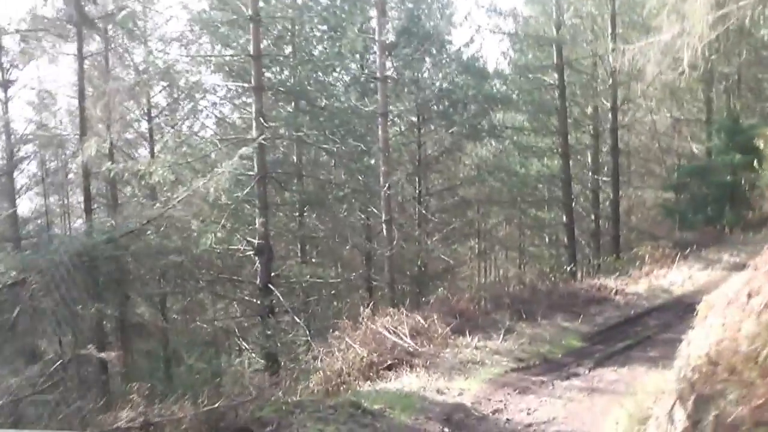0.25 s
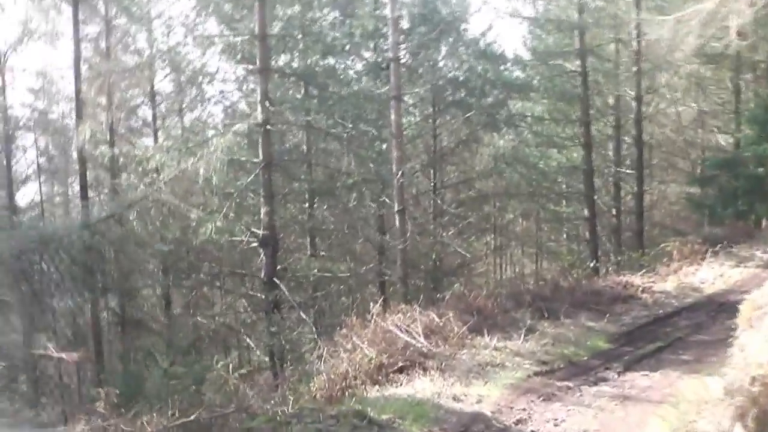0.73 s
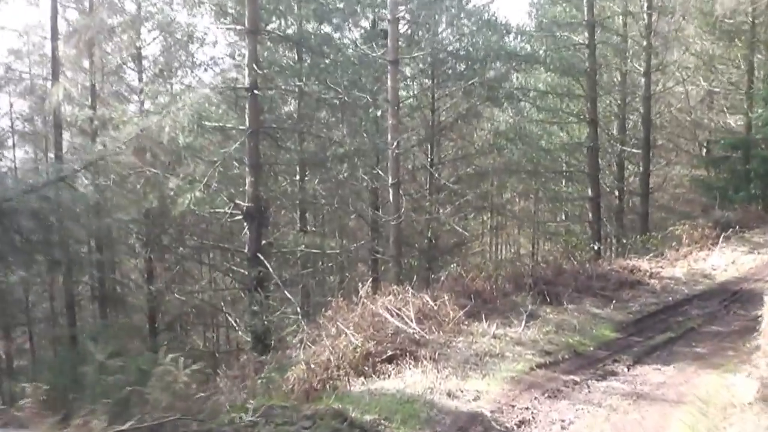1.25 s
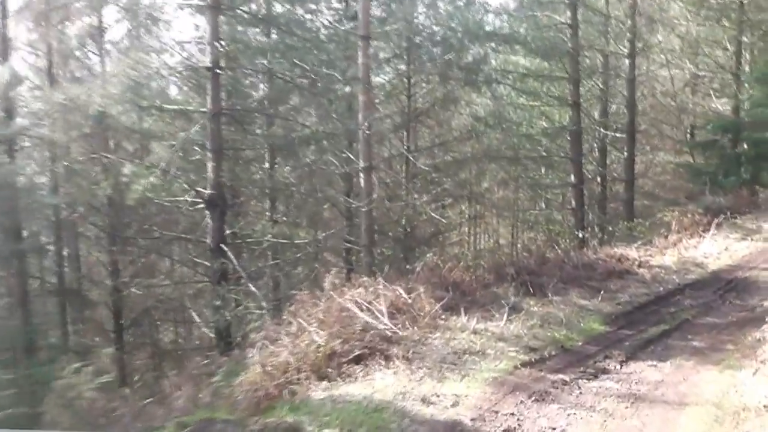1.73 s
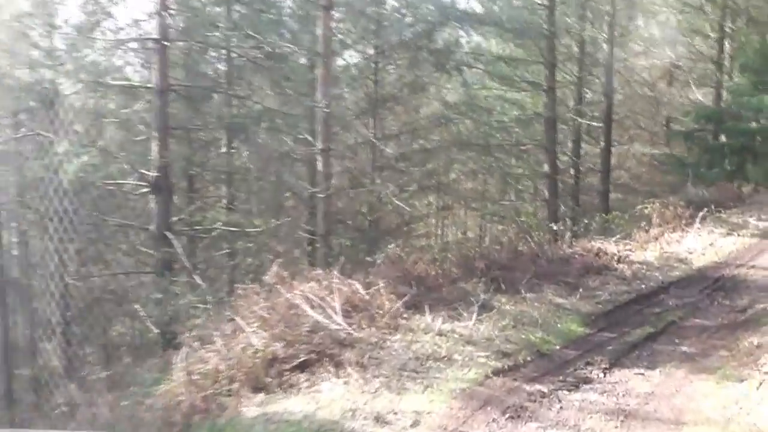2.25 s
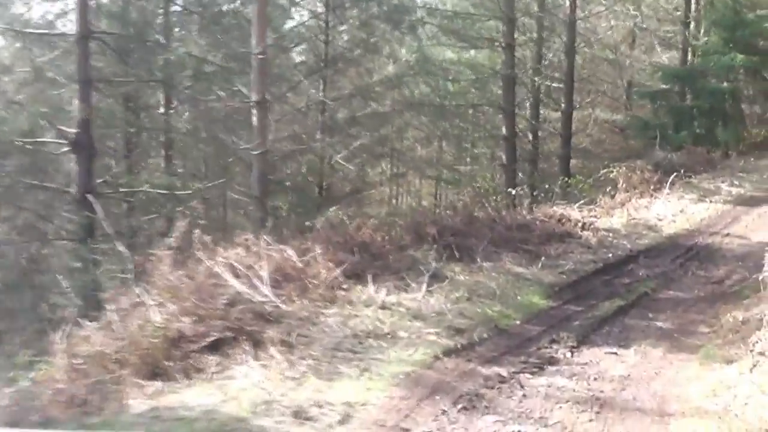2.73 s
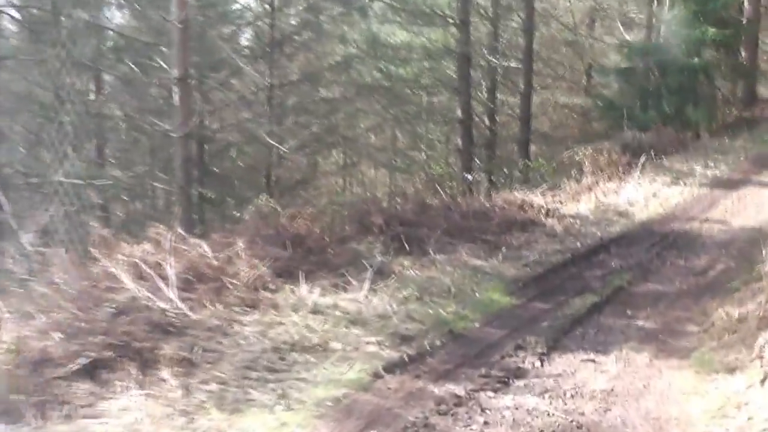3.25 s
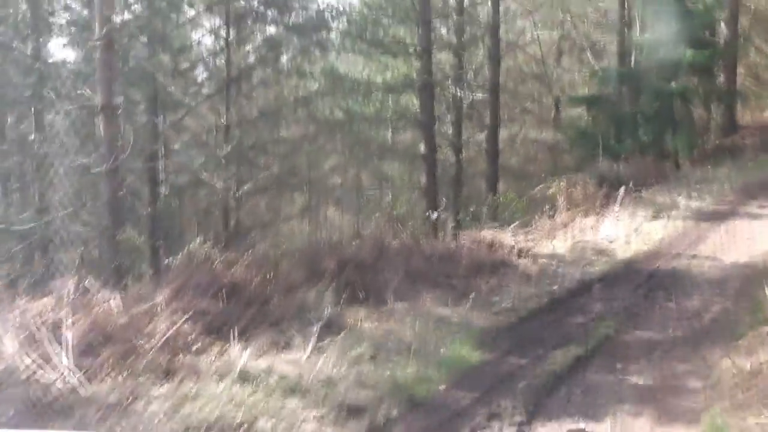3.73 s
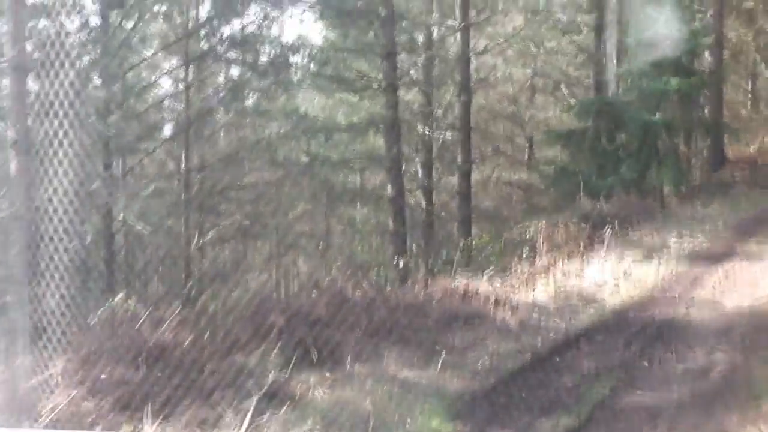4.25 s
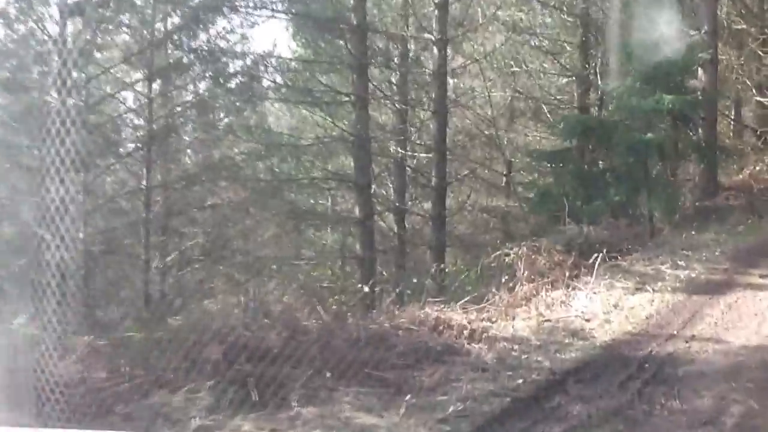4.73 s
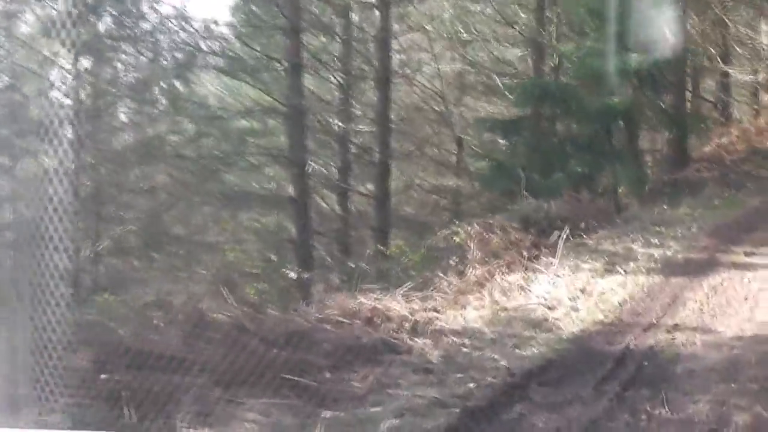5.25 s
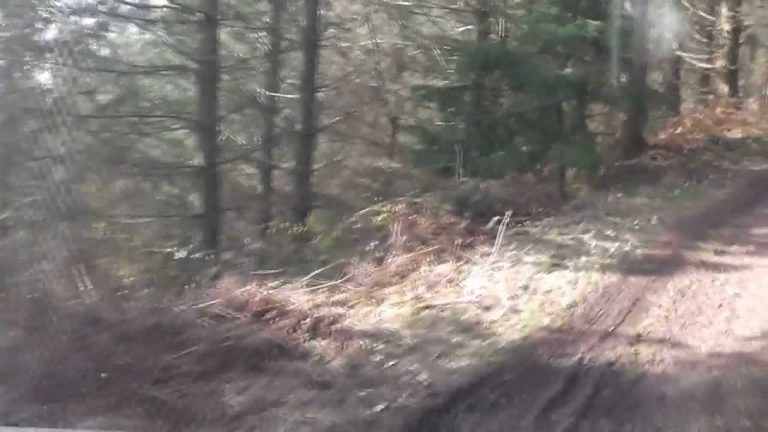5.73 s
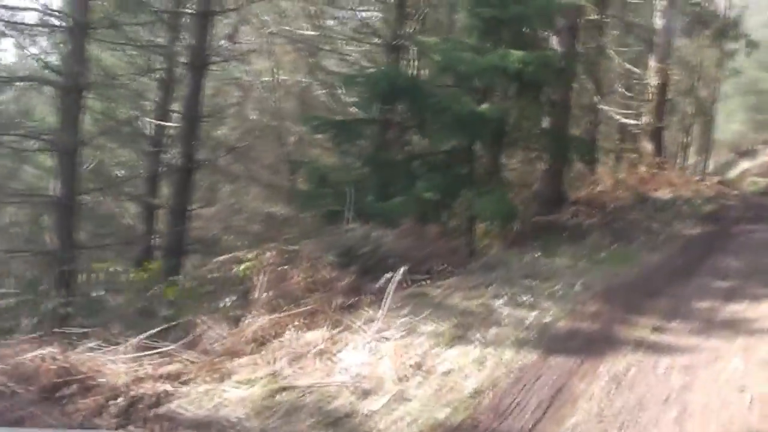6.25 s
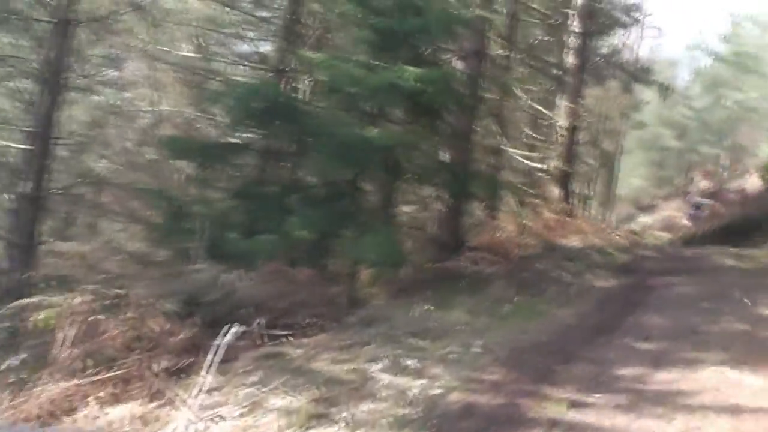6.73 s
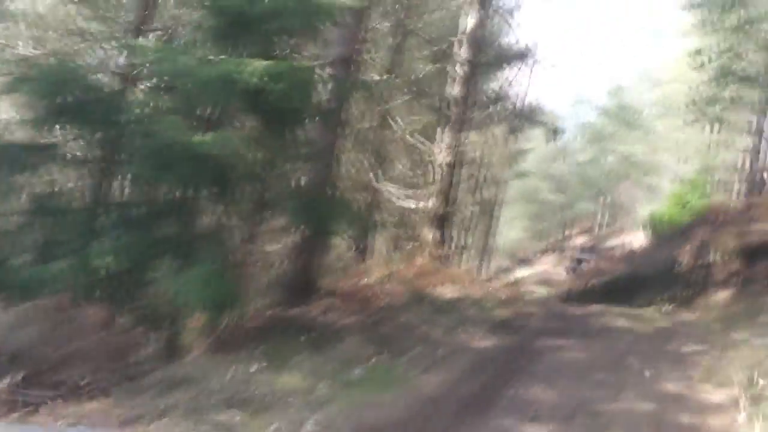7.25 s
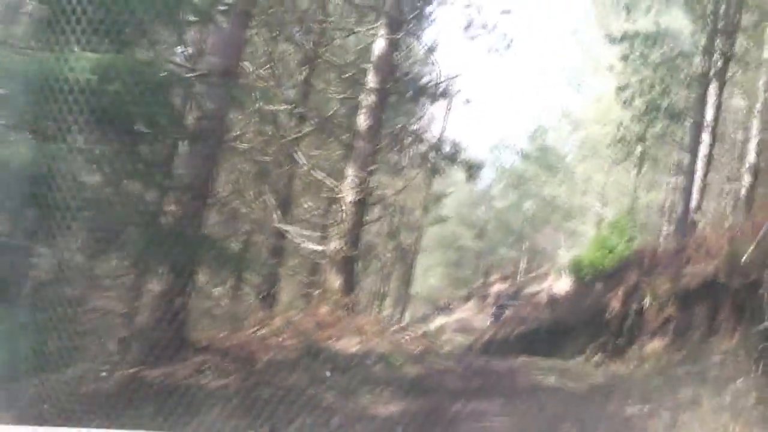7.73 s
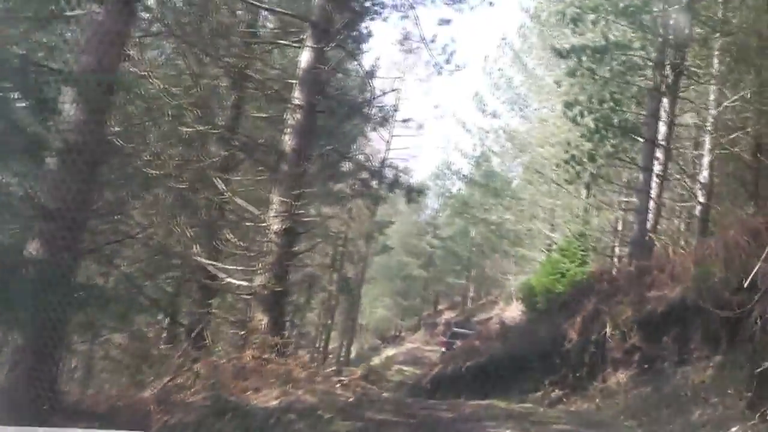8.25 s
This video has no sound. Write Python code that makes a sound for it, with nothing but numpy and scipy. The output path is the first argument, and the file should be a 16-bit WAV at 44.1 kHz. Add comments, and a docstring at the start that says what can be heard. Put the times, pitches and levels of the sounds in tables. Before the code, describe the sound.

Heard inside the cab, a deep, swelling boom and an engine's drone carry an off-road vehicle slowly over a muddy forest track. Sharp close knocks and suspension thuds come first, then more jolts around the middle, with light trim ticks and a faint tyre hiss throughout. The engine speeds up a little, the loose fitting clacks again, and a last jolt brings a short spray of mud.

```python
"""A deep boom and a few close knocks, over an engine's drone: a four-wheel-drive crawls along a rutted
forest track, with the microphone at a seat inside the cab. The four-cylinder engine slowly picks up
speed, its orders swelling as they pass the cab's resonances. The body booms and rumbles over the ground
and ruts jolt the suspension. Close by, a loose fitting knocks, the trim ticks and there is one faint
squeak; outside, the tyres hiss in the mud and one burst of spray rings with a thin whistle."""
import sys
import numpy as np
from scipy import signal
from scipy.fft import rfft, irfft, next_fast_len
from scipy.io import wavfile
from scipy.ndimage import uniform_filter1d

SR = 44100
rng = np.random.default_rng(int(sys.argv[2]) if len(sys.argv) > 2 else 0)


def master(y):
    """Save y as 16-bit WAV."""
    cut = np.clip(np.atleast_2d(y).T, -1, 1)
    pcm = np.round(cut * 32767)  # scale
    wavfile.write(sys.argv[1], SR, pcm.astype(np.int16))


N = 374409
TIME = np.arange(N) / SR


def from_db(db):
    return 10 ** (np.asarray(db) / 20)


def unit_rms(x):
    return x / np.sqrt(np.mean(x ** 2) + 1e-20)


def in_time(rows):
    """Each column of a curve, sample by sample."""
    times, *columns = np.transpose(rows)
    return [np.interp(TIME, times, column) for column in columns]


def at_hz(points, hz):
    """Reads a table on a log-frequency axis."""
    freqs, values = np.transpose(points)
    return np.interp(np.log(hz + 1e-9), np.log(freqs), values)


def drift(rate, times=TIME):
    """A random wander of rms 1 that turns about `rate` times a second."""
    knots = rng.standard_normal(4000)
    return unit_rms(np.interp(times * rate, np.arange(len(knots)), knots))


def lowpass(x, hz):
    return signal.sosfilt(signal.butter(2, hz, fs=SR, output="sos"), x)


def evened(x, span):
    """Takes out the swells slower than `span` seconds."""
    return x / np.sqrt(uniform_filter1d(np.mean(x ** 2, axis=0), int(span * SR) + 1) + 1e-9)


def ring(clicks, hz, t60):
    """A unit click sets a sine of height 1 ringing."""
    r, w = from_db(-60 / (t60 * SR)), 2 * np.pi * hz / SR
    return signal.lfilter([0, np.sin(w)], [1, -2 * r * np.cos(w), r * r], clicks + 1e-18)


def strikes(times, levels_db):
    """One click for each contact."""
    out = np.zeros(N)
    out[(np.asarray(times) * SR).astype(int)] = from_db(levels_db)
    return out


def fading(clicks, t60):
    """An envelope that jumps at each click and dies away."""
    return signal.lfilter([1], [1, -from_db(-60 / (t60 * SR))], clicks + 1e-18)


def swell(age, length):
    """A quick rise to 1 at half of `length`, then a slower fall."""
    u = np.maximum(age, 0) / (length / 2)
    return u * np.exp(1 - np.minimum(u, 60))


def humps(rows):
    """An envelope with one bell-shaped rise for each row."""
    return sum(from_db(db) * np.exp(-2 * ((TIME - peak) / width) ** 2) for peak, db, width in rows)


# How alike the microphone's two sides are. Each row: frequency in Hz, correlation from 0 to 1.
STEREO_LIKENESS = [(70, 0.99), (250, 1), (500, 0.95), (4000, 0.82), (8000, 0.34), (12000, 0.1)]

def noise(spectrum):
    """Stereo noise of rms 1 in a given colour, rolled off at both ends and wider in the treble."""
    size = next_fast_len(N)
    hz = np.arange(size // 2 + 1) * SR / size + 1e-3
    roll_off = (1 + (spectrum[0][0] / hz) ** 4) * (1 + (hz / spectrum[-1][0]) ** 4)
    gain = from_db(at_hz(spectrum, hz)) / roll_off
    alike = at_hz(STEREO_LIKENESS, hz)
    mid, side = rfft(rng.standard_normal((2, size))) * gain * np.sqrt([1 + alike, 1 - alike])
    return unit_rms(irfft(np.array([mid + side, mid - side]), size)[:, :N])


# Thin high whistles: a faint squeak, and the ring of the mud spray.
# Each row: start in seconds, level in dB, pitch in Hz, length in seconds.
THIN_WHISTLES = [(4.765, -58, 7140, 0.089), (7.85, -49, 12300, .12)]

def thin_whistles():
    """Faint at the microphone, each high tone swells and fades, its pitch wavering by about 1 %."""
    unsteady_time = np.cumsum(1 + .01 * drift(300)) / SR
    out = np.zeros(N)
    for start, db, hz, length in THIN_WHISTLES:
        arch = np.sin(np.pi * np.clip((TIME - start) / length, 0, 1))
        out += from_db(db) * arch * np.sin(2 * np.pi * hz * unsteady_time)
    return out


# Wet ground under the tyres, outside the cab. Each row: time in seconds, relative hiss level in dB.
WETNESS = [(0, -60), (.93, -61), (1.0, -55), (1.22, -61), (1.45, -59.5), (1.9, -64), (2.15, -59),
           (2.7, -63.5), (4.4, -65.5), (5.1, -62.5), (7.8, -61), (7.92, -56), (8.1, -58.5), (8.49, -62)]
# Mud sprays off a tyre. Each row: start in seconds, level in dB, length in seconds.
SPLASHES = [(1.646, -55, 0.14), (7.846, -30, 0.016), (7.891, -40, 0.027)]
# Tread hiss and spray as they reach the seat. Each row: frequency in Hz, relative level in dB.
HISS_SPECTRUM = [(2400, -15), (3700, -10), (4200, -3.5), (5000, -5.5), (8500, -6.5), (10600, -0.5),
                 (12000, -7), (16000, -7.5)]
SPRAY_SPECTRUM = [(3000, -15), (5000, -8.5), (9000, -2.5), (12000, 1.5), (16000, -14)]

def tyres(hiss_db=3, flicker_db=1, patch_db=1.1, grit_db=-5, grit_per_s=260, grit_cycles=22):
    """Outside, wet ground hisses under the tread, bits of grit snap and wet ruts throw up spray."""
    mud = from_db(in_time(WETNESS)[0] + patch_db * drift(14))
    sizes = from_db(4 * np.minimum(rng.exponential(1, N), 3)) * rng.choice([-1, 1], N)
    snaps = (rng.random(N) < grit_per_s / SR) * sizes
    pitches_hz = np.geomspace(4200, 11000, 12)
    pitch_index = rng.integers(0, len(pitches_hz), N)  # each snap rings at one of these pitches
    grit = sum(ring(snaps * (pitch_index == k), hz, grit_cycles / hz) for k, hz in enumerate(pitches_hz))
    hiss = from_db(hiss_db) * mud * noise(HISS_SPECTRUM)
    flicker = from_db(flicker_db * drift(300))
    splashing = sum(from_db(db) * swell(TIME - start, length) for start, db, length in SPLASHES)
    spray = splashing * noise(SPRAY_SPECTRUM)
    return from_db(grit_db) * mud * unit_rms(grit) + flicker * (hiss + spray)


# The sharpest ticks of the trim. Each row: start in seconds, relative level in dB.
TRIM_TICKS = [(0.025, -42), (0.518, -45), (0.8993, -38.5), (0.9665, -41), (0.975, -48), (1.246, -48),
              (1.412, -45), (1.761, -47), (1.857, -47), (3.1088, -51), (3.21, -49), (3.747, -48),
              (3.818, -43), (3.985, -51), (4.0822, -44.5), (4.122, -50), (4.4973, -55), (4.531, -48),
              (5.189, -52), (5.903, -51), (6.032, -50), (6.371, -44.5), (6.4, -47), (6.47, -50),
              (6.773, -49), (7.974, -44.5), (8.052, -46), (8.2576, -43), (8.332, -45), (8.464, -47)]
# The colour of a tick, and of a knock's crack. Each row: frequency in Hz, relative level in dB.
SNAP_SPECTRUM = [(1800, 3), (3400, -1), (4700, 5.5), (7000, 2.5), (12000, -1), (16000, -13)]

def trim(tick_db=2, faint_per_s=12, faint_db=-56, snap_t60=0.014, buzz_db=-9, buzz_t60=0.13):
    """Around the microphone, loose trim ticks, each tick a snap with a short buzz."""
    starts, levels_db = np.transpose(TRIM_TICKS)
    faint_taps = (rng.random(N) < faint_per_s / SR) * from_db(faint_db + 5 * rng.uniform(-1, 1, N))
    taps = strikes(starts, levels_db + tick_db) + faint_taps
    return (fading(taps, snap_t60) + from_db(buzz_db) * fading(taps, buzz_t60)) * noise(SNAP_SPECTRUM)


# First reflections off windscreen, door and roof. Each row: delay in seconds, relative level in dB.
CAB_ECHOES = [(.0047, -6.5), (.0074, -11), (0.0089, -9.5)]

def cab_reflections(age, tail_db=-32, tail_t60=0.07, lining_hz=2000):
    """The near walls return a click as echoes and a short tail; seats and lining soak up the treble."""
    echoes = from_db(tail_db - 60 * age / tail_t60) * rng.standard_normal(len(age)) * (age > .002)
    for delay, db in CAB_ECHOES:
        echoes[int(delay * SR)] += from_db(db)
    return lowpass(echoes, lining_hz)


# A loose fitting knocks inside the cab. Each row: start in seconds, relative ring level in dB,
# chatter length in seconds, relative crack level in dB, the crack's treble cutoff in Hz.
KNOCKS = [(0.041, -8.5, 0.0074, -27, 6850), (0.069, -16.5, 0.028, -41, 5000),
          (0.5474, -7, 0.006, -21.5, 14000), (0.562, -17, 0.027, -48, 6000),
          (2.898, -12.5, 0.03, -53, 3200), (5.572, -23.5, 0.0091, -55, 2000),
          (6.098, -15.5, 0.016, -44, 5500), (6.123, -16, 0.016, -42, 5500), (6.865, -15, 0.0091, -37, 4000),
          (7.203, -8, 0.003, -18.5, 13000), (7.292, -9.5, 0.01, -23, 2400),
          (7.3543, -14.5, 0.006, -33, 2400)]
# The fitting's modes. Each row: frequency in Hz, relative level in dB, time to fall 60 dB in seconds.
FITTING_MODES = [(420, 0, 0.014), (539, -1.5, 0.021), (780, 0, 0.011), (1050, 0.5, 0.014),
                 (1254, -1, 0.0097), (1696, -9, 0.026), (2320, -7.5, 0.0089)]
# A steel bracket rings on after some knocks. Each row: start in seconds, level in dB.
BRACKET_RINGS = [(0.051, -30.5), (6.099, -35), (6.868, -38)]

def loose_fitting(variety_db=2.1, even_chatter_s=0.016, ping_db=-9, bracket_hz=1534):
    """Close by, each knock cracks, chatters and rings the fitting's modes; the cab walls scatter it."""
    age = np.arange(SR // 4) / SR
    click = 1.0 * (age == 0)
    walls = cab_reflections(age)
    snap_noise = noise(SNAP_SPECTRUM)
    ping = from_db(ping_db) * ring(click, hz=4285, t60=0.039)
    out = np.zeros((2, N))
    for start, ring_db, length, crack_db, top_hz in KNOCKS:
        span = slice(int(start * SR), int(start * SR) + len(age))
        chatter = swell(age, length) * rng.standard_normal(len(age))
        # a short knock is one dry clack, a long one mostly chatter
        contact = click + length / even_chatter_s * chatter / np.linalg.norm(chatter)
        contact = lowpass(contact, hz=880 + 0.1 * top_hz)  # a harder knock chatters more brightly
        modes = sum((-1) ** k * from_db(db + variety_db * rng.standard_normal()) * ring(click, hz, t60)
                    for k, (hz, db, t60) in enumerate(FITTING_MODES))
        rings = signal.fftconvolve(contact, modes)[:len(age)]
        rings *= from_db(ring_db) * np.linalg.norm(modes) / np.linalg.norm(rings)
        echoes = signal.fftconvolve(rings, walls)[:len(age)]
        # only a hard contact reaches the high metallic ping
        crack = lowpass(fading(click, t60=0.022) * snap_noise[:, span] + ping, top_hz)
        out[:, span] += rings + echoes + from_db(crack_db) * crack
    bracket = ring(strikes(*np.transpose(BRACKET_RINGS)), bracket_hz, t60=0.27)
    return out + bracket


# The suspension jolts. Each row: start in seconds, then thump, thud and clunk levels in dB.
JOLTS = [(.085, -12.5, -12.5, -32), (.235, -31, -23.5, -47), (.51, -11.5, -22.5, -24.5),
         (1.009, -12, -44, -49), (2.651, -33, -29, -42), (2.854, -27, -37, -26), (2.91, -14, -15.5, -38),
         (3.998, -15, -20, -25.5), (4.102, -16.5, -11, -15), (4.159, -17.5, -25, -44),
         (5.569, -17.5, -18, -20), (6.10, -15, -12, -32), (6.22, -15, -32, -30), (6.397, -26, -42, -23.5),
         (7.862, -14, -17, -18.5)]
# The chassis's thump, thud and clunk, in that order. Each row: centre in Hz, length in seconds.
CHASSIS_MODES = [(103, 0.032), (198, 0.052), (460, 0.02)]

def suspension(band_ratio=1.565, tone_share=0.73):
    """Under the floor a wheel drops into a rut: each chassis mode rings out inside a dull shudder."""
    out, age = np.zeros(N), np.arange(SR // 2) / SR
    for start, *levels_db in JOLTS:
        first = int(start * SR)
        for db, (hz, length) in zip(levels_db, CHASSIS_MODES):
            band = signal.butter(3, [hz / band_ratio, hz * band_ratio], "band", fs=SR, output="sos")
            shape = swell(age, length)
            shudder = unit_rms(signal.sosfilt(band, rng.standard_normal(SR))[-len(age):] * shape)
            tone = unit_rms(np.sin(2 * np.pi * hz * age) * shape)
            blow = unit_rms(tone_share * tone + np.sqrt(1 - tone_share ** 2) * shudder)
            blow *= np.sqrt(np.mean(shape ** 2))
            out[first:first + len(age)] += from_db(db) * blow[:N - first]
    return out


# Rough ground between the ruts. Each row: time in seconds, relative boom and rumble levels in dB.
ROUGHNESS = [(0, -17, -17.5), (1.6, -21, -25), (3.1, -17.5, -20.5), (4.2, -20.5, -20.5), (5.3, -22.5, -24),
             (5.65, -20, -21), (6.35, -15, -19.5), (7.6, -25.5, -27), (8.49, -23.5, -24)]
# The body pitches through a rut. Each row: deepest moment in seconds, relative boom level in dB,
# length in seconds.
RUTS = [(0.22, -19, 0.068), (0.6, -12.5, 0.18), (1.057, -10, 0.057), (1.785, -13.5, 0.11),
        (2.15, -9.5, 0.052), (2.695, -16, 0.26), (3.25, -12, 0.1), (3.678, -10, 0.086), (4.08, -15, 0.31),
        (5.04, -15, 0.28), (5.675, -11.5, 0.14), (5.878, -14, 0.058), (6.28, -14, 0.091), (7.23, -19, 0.48),
        (7.903, -13.5, 0.22)]
# Cab boom and road rumble at the seat. Each row: frequency in Hz, relative level in dB.
BOOM_SPECTRUM = [(9, -43), (27, 6.5), (35, -5.5), (43, -5.5), (58, -15), (90, -16.5)]
RUMBLE_SPECTRUM = [(45, -18), (70, 2), (102, -5), (135, -9.5), (170, -5.5), (205, -7), (255, -12),
                   (315, -9), (560, -28), (1150, -31.5), (1900, -48.5)]

def body(boom_db=3, rut_rumble_db=-13, shudder_db=-11, shudder_t60=0.68):
    """Ruts pump a deep boom all round the microphone; ground, ruts and jolts rumble up the chassis."""
    sway_db, road_db = in_time(ROUGHNESS)
    pitching = humps(RUTS)
    starts, thump_db, _, _ = np.transpose(JOLTS)
    shudder = fading(strikes(starts, thump_db + shudder_db), shudder_t60)
    boom_level = from_db(boom_db) * np.hypot(from_db(sway_db), pitching)
    rumble_level = np.sqrt(from_db(road_db) ** 2 + (from_db(rut_rumble_db) * pitching) ** 2 + shudder ** 2)
    boom = boom_level * evened(noise(BOOM_SPECTRUM), span=0.06)
    rumble = rumble_level * evened(noise(RUMBLE_SPECTRUM), span=0.14)
    return boom + rumble


# Engine orders that stand out. Each row: multiple of crank speed, extra level in dB.
STRONG_ORDERS = [(2, 15.5), (4, 10.5), (6, 5), (7, 7.5), (8, 6), (9, 2.5), (10, 6)]
# How strongly an order reaches the seat. Each row: frequency in Hz, gain in dB.
CAB_RESPONSE = [(100, -20), (150, -7.5), (185, -3.5), (215, -14.5), (270, -11.5), (325, -6.5), (365, -9),
                (420, -6), (456, -15), (520, -16.5), (1000, -26), (1180, -31.5), (1600, -43), (2300, -60)]

def engine_drone(speed, angle, waver=0.64, flutter=0.28):
    """A four-stroke cycle lasts two turns, giving half orders; each swells at the cab's resonances."""
    extra_db = dict(STRONG_ORDERS)
    steps, step_speed = TIME[::200], speed[::200]
    drone = np.zeros(N)
    for order in np.arange(2, 32, .5):
        height = from_db(extra_db.get(order, 0) + at_hz(CAB_RESPONSE, order * step_speed))
        height *= 1 + waver * drift(16, steps) + flutter * drift(70, steps)  # uneven combustion
        drone += np.interp(TIME, steps, height) * np.cos(order * angle + 2 * np.pi * rng.random())
    return drone


# A panel's resonance. Each row: frequency in Hz, gain in dB.
PANEL_RESPONSE = [(950, -18), (1100, -14), (1160, -2.5), (1200, 0), (1260, -10), (1400, -8), (1650, -15)]

def panel_whine(speed, turns, waver=0.5):
    """High firing harmonics sing in turn as they glide through the panel's resonance."""
    steps, step_speed = TIME[::200], speed[::200]
    whine = np.zeros(N)
    for order in range(20, 32, 2):
        height = from_db(at_hz(PANEL_RESPONSE, order * step_speed)) * (1 + waver * drift(16, steps))
        whine += np.interp(TIME, steps, height) * np.cos(2 * np.pi * (order * turns + rng.random()))
    return whine


# The engine pulls hard. Each row: peak time in seconds, level at resonance in dB, length in seconds.
HARD_PULLS = [(4.754, -28.5, 0.92), (7.43, -22.5, 0.25), (8.113, -26.5, 0.3)]

def cab_hum(speed, angle, resonance_hz=410, width_hz=31.3):
    """Under a hard pull, the orders near one cab resonance hum cleanly."""
    hum = np.zeros(N)
    for order in range(7, 11):
        nearness = np.exp(-((order * speed - resonance_hz) / width_hz) ** 2 / 2)
        hum += nearness * np.cos(order * angle + 2 * np.pi * rng.random())
    return humps(HARD_PULLS) * hum


# Engine speed. Each row: time in seconds, crank turns per second.
CRANK_SPEED = [(0, 40), (.8, 38.9), (1.25, 40.2), (1.82, 39.25), (3.07, 45), (3.44, 43.3), (4.22, 43.5),
               (4.44, 45.25), (4.91, 45.85), (5.26, 49.2), (5.69, 51.4), (6.04, 54.8), (7.11, 53.65),
               (7.36, 55.5), (7.68, 52.2), (8.49, 54.4)]
# Load on the engine. Each row: time in seconds, relative drone level in dB.
ENGINE_LOAD = [(0, -28), (.8, -27), (1.55, -31.5), (1.8, -24), (2.6, -26.5), (3.6, -27.5), (4.6, -26),
               (5.3, -26.5), (6.6, -25), (8.49, -24)]
# Engine clatter from inside the cab. Each row: frequency in Hz, relative level in dB.
CLATTER_SPECTRUM = [(200, -23), (400, 4.5), (600, 0), (930, -4.5), (1150, -5.5), (1650, -9.5),
                    (2400, -24.5), (3300, -40), (4000, -26.5), (4800, -33.5)]

def engine(drone_db=-6, whine_db=-48, clatter_db=-36.5, cruise_turns_per_s=46, throb=0.1):
    """The engine, just ahead of the cab: its drone follows the load; whine and clatter grow with speed."""
    speed, = in_time(CRANK_SPEED)
    load_db, = in_time(ENGINE_LOAD)
    doublings = np.log2(speed / cruise_turns_per_s)
    turns = np.cumsum(speed) / SR
    wobble_turns = 0.0077 * drift(14)
    angle = 2 * np.pi * (turns + wobble_turns)
    drone = from_db(load_db + drone_db) * engine_drone(speed, angle)
    whine = from_db(whine_db + 20 * doublings) * panel_whine(speed, turns + wobble_turns / 2)
    hum = cab_hum(speed, angle)
    firing = 1 + throb * np.cos(2 * angle)  # four cylinders fire twice a turn
    clatter = from_db(clatter_db + 10 * doublings) * firing * noise(CLATTER_SPECTRUM)
    return drone + hum + whine + clatter


def scene(lean_db=0.41):
    """Everything reaches the microphone at the seat a little stronger on the right."""
    cab = engine() + body() + suspension() + loose_fitting() + trim() + thin_whistles() + tyres()
    return cab * from_db([[-lean_db], [lean_db]])


def record(dry, fade_in_s=0.003, cutoff_hz=15900):
    """The biggest peaks are rounded and the highest treble is cut."""
    rounded = dry / (1 + dry ** 8) ** (1 / 8)
    fade_in = np.minimum(TIME / fade_in_s, 1)
    return signal.sosfilt(signal.ellip(10, .1, 80, cutoff_hz, fs=SR, output="sos"), rounded * fade_in)


dry = scene()
out = record(dry)
master(out)
```